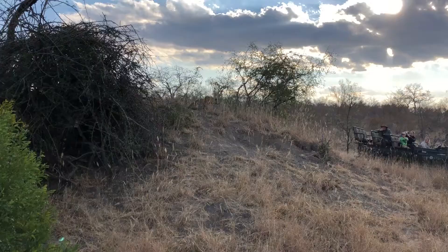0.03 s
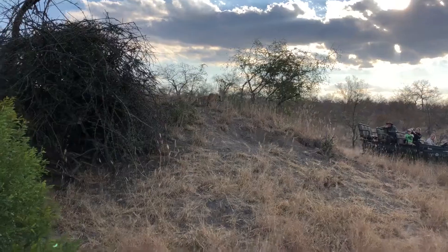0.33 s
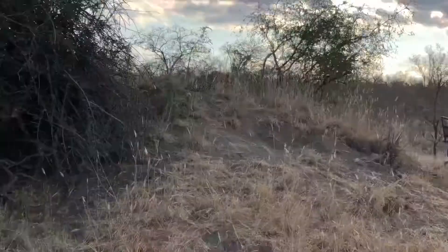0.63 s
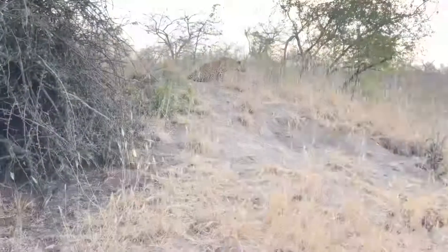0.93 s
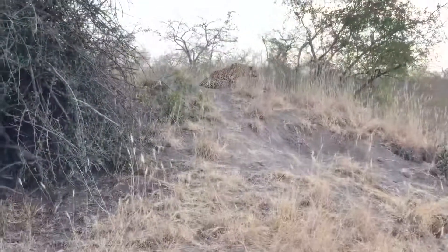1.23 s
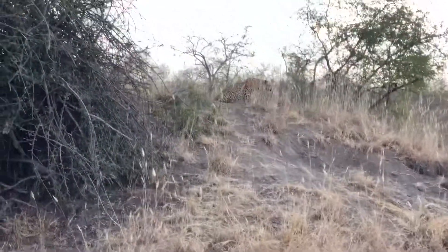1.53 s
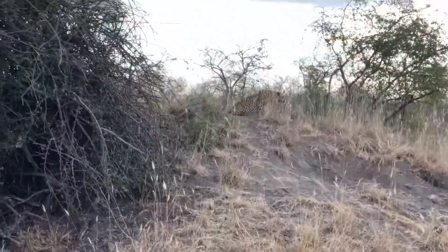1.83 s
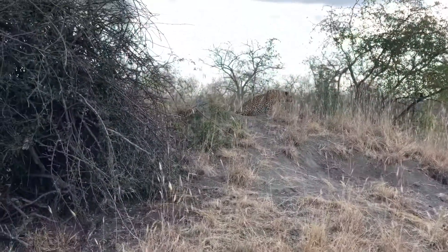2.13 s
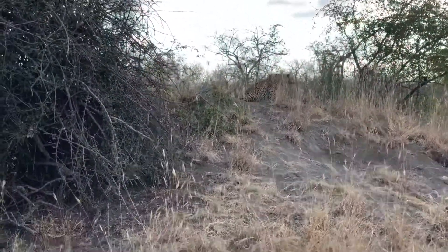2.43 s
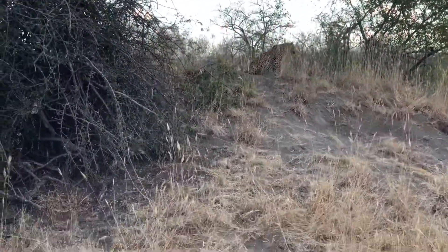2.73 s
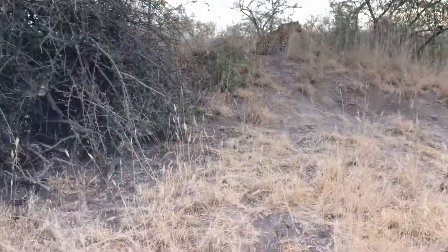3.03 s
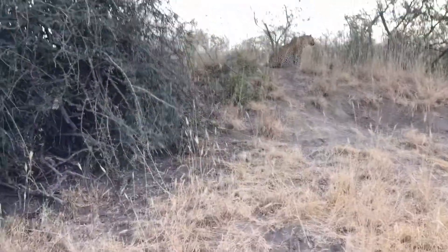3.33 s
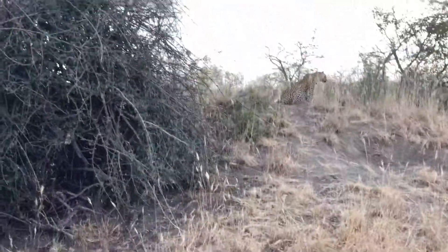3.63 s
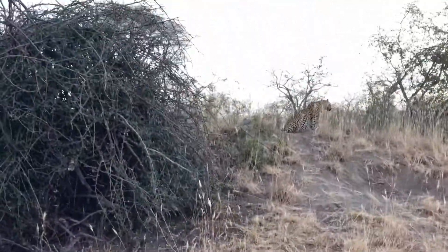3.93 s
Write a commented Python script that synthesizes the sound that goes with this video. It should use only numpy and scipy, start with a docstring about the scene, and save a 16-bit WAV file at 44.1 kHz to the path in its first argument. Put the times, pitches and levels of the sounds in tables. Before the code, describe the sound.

A leopard gives three hoarse, sawing rasps over an idling vehicle engine.

```python
"""Leopard sawing beside an idling vehicle

A leopard on a grassy mound saws three times: slow throat clicks on the in-stroke, then a hoarse low
rasp as its loose vocal folds flap on the out-stroke. Close by a vehicle idles with a throbbing
exhaust, ticking valves and a faintly chirping belt. Fingers tick on a camera; something rustles."""
import sys
import numpy as np
from scipy import signal
from scipy.fft import rfft, irfft
from scipy.io import wavfile
from scipy.ndimage import uniform_filter1d

SR = 44100
rng = np.random.default_rng(int(sys.argv[2]) if len(sys.argv) > 2 else 0)


def transcribe(u):
    """Save the signal u as a 16-bit wav file named by the first command-line argument.

    u: samples, shape (n,) or (channels, n), limited to [-1, 1]; the rate is SR.
    q: integer samples, one column per channel.
    """
    v = np.clip(np.atleast_2d(u).T, -1, 1)
    q = np.round(v * 32767).astype(np.int16)
    wavfile.write(sys.argv[1], SR, q)


N = 176400
T = np.arange(N) / SR

# colour of the open air: freq_hz, relative_db
AIR_COLOUR = [(400, -2.5), (480, -3.5), (1150, -6.5), (1750, -6), (2000, -13.5), (2700, -12.5), (3700, -21),
              (5200, -17.5), (6600, -27), (10000, -28.5), (15000, -36)]
# its fader: time_s, level_db
AIR_LEVEL = [(.6, -55), (1.4, -53), (2.7, -55.5), (4, -57)]
# engine speed as twice the firing rate: time_s, pitch_hz
ENGINE_SPEED = [(.6, 63), (1.15, 69), (1.7, 69), (2.1, 70), (2.8, 67.6), (4, 67.8)]
# the exhaust's second harmonic: time_s, level_db
BOOM_LEVEL = [(.25, -35), (.7, -45), (.83, -38.5), (1.0, -29), (1.2, -36), (2.15, -39.5), (3.05, -30.5),
              (4, -34.5)]
# its third harmonic: time_s, level_db
DRONE_LEVEL = [(.25, -31.5), (.68, -36), (.82, -44.5), (1.02, -37.5), (1.5, -40), (2.25, -35.5),
               (2.7, -48.5), (4, -41.5)]
# its other partials: multiple_of_firing_rate, level_db
EXHAUST_PARTIALS = [(1, -61), (2.5, -50), (3.5, -50.5), (4, -55.5), (5.5, -54.5), (7.6, -59.5), (11, -63)]
# colour of the engine rumble: freq_hz, relative_db
RUMBLE_COLOUR = [(20, -53), (45, -7.5), (90, 7.5), (140, -8), (180, -3.5), (275, -3), (330, -11),
                 (900, -44.5)]
# its fader: time_s, level_db
RUMBLE_LEVEL = [(.2, -42), (.65, -45.5), (1.6, -45), (2.7, -47), (4, -45.5)]
# hollow swells in the rumble: peak_s, half_width_s, pitch_hz, level_db
SWELLS = [(1.906, 0.2, 176.2, -44.5), (2.357, 0.061, 135, -39)]
# colour of the valve ticks: freq_hz, relative_db
TICK_COLOUR = [(900, 7), (2700, 6), (3300, -2.5), (4600, -20), (6500, -7), (16000, -20)]
# their fader: time_s, level_db
TICK_LEVEL = [(.9, -60.5), (1.3, -57.5), (2.75, -61.5), (3.0, -65)]
# resonances of the engine's bright chirr: freq_hz, width_hz, relative_db
CHIRR_BANDS = [(3820, 1200, 4.5), (4404, 240, 1), (4820, 500, 0)]
# its fader: time_s, level_db
CHIRR_LEVEL = [(1.0, -70), (1.25, -63.5), (2.1, -65.5), (2.8, -64), (2.97, -76)]
# resonances of the belt: freq_hz, width_hz, relative_db
BELT_BANDS = [(1497, 17, -4), (1591, 18, -2), (1692, 17.7, 2.5), (1803, 49, -2), (2146, 53, -12)]
# its fader: time_s, level_db
BELT_LEVEL = [(.25, -57), (.55, -60.5), (1.3, -57.5), (2.1, -64), (3.1, -56), (4, -59)]

# band of the dry rustle: freq_hz, width_hz, relative_db
RUSTLE_BAND = [(3450, 2200, 0)]
# its fader: time_s, level_db
RUSTLE_LEVEL = [(3.28, -90), (3.34, -64), (3.45, -68.5), (3.56, -90)]
# fader of the rubbing fingers: time_s, level_db
RUB_LEVEL = [(.7, -72.5), (.88, -66.5), (1.55, -68), (2.4, -74.5), (3.3, -80), (3.37, -66), (3.55, -75)]
# finger ticks: start_s, level_db, decay_s
FINGER_TICKS = [(1.117, -43, .008), (1.133, -49, .009), (1.400, -40, .006), (2.0805, -39.5, .006),
                (2.850, -53, .002)]
# colour of the rub and the finger ticks: freq_hz, relative_db
SHELL_COLOUR = [(2000, -11), (6000, -4.5), (8000, -2.5), (9700, 1), (12000, -1.5), (14500, 1)]

# echo off the bush: delay_s, gain_db
BUSH_ECHO = [(.037, -14.5)]
# throat slaps on the in-strokes: start_s, level_db
THROAT_SLAPS = [(0.173, -31.5), (0.273, -31), (0.748, -33), (.783, -32.5), (0.815, -29), (1.333, -32),
                (1.368, -31), (1.406, -36)]
# the throat modes they ring: freq_hz, gain_db, t60_s
THROAT_MODES = [(220, 0.5, 0.037), (434, 0.5, 0.009), (925, -9, 0.024)]
# hard catches of the voice: start_s, level_db
CATCHES = [(.380, -38.5), (.924, -39.5), (.960, -30.5), (1.531, -41), (1.592, -29.5)]
# resonances of the open mouth: freq_hz, width_hz, relative_db
MOUTH_BANDS = [(182, 29, -2.5), (274, 52, -4), (527, 52, -3.5), (630, 51, -1.5), (795, 40, 1.5),
               (935, 35, 1), (1021, 43, 2.5)]
# upper resonances that colour the hiss: freq_hz, width_hz, relative_db
MUZZLE_BANDS = [(1426, 104, 10), (1702, 26, 12), (2124, 380, 8.5), (2593, 45, 13.5), (2790, 500, 0.5),
                (4400, 750, -4.5), (8160, 2000, -11.5)]
# out-strokes: start_s, length_s, chest_db, mouth_db, hiss_db, hollow_hz, hollow_db, tail_db
RASPS = [(0.394, 0.06, -28, -41, -46.5, 835, -49.5, -39.5), (0.932, 0.093, -29, -44, -48.3, 780, -49, -45),
         (1.531, 0.0773, -31.5, -47, -54, 735, -46, -39)]


def from_db(db):
    """Decibels to gain."""
    return 10 ** (np.asarray(db) / 20)


def rms_one(x):
    """Scale to rms 1."""
    return x / np.sqrt(np.mean(x ** 2) + 1e-20)


def curve(rows):
    """Join (time_s, value) rows by straight lines."""
    return np.interp(T, *np.transpose(rows))


def drift(rate_hz):
    """Random wander up to about rate_hz, rms 1."""
    rolloff = 1 + (np.fft.rfftfreq(N, 1 / SR) / rate_hz) ** 4
    return rms_one(irfft(rfft(rng.standard_normal(N)) / rolloff, N))


def noise(colour):
    """Noise of a given colour, rms 1."""
    hz, db = np.transpose(colour)
    gain = from_db(np.interp(np.log(np.fft.rfftfreq(N, 1 / SR) + 1), np.log(hz), db))
    return rms_one(irfft(rfft(rng.standard_normal(N)) * gain, N))


def band_noise(bands):
    """White noise through steep resonances in parallel."""
    white = rng.standard_normal(N)
    out = 0
    for hz, width, db in bands:
        r = np.exp(-np.pi * width * np.sqrt(2) / SR)
        b = (1 - r * r) / 2 * np.array([1, 0, -1])
        a = [1, -2 * r * np.cos(2 * np.pi * hz / SR), r * r]
        out += from_db(db) * signal.lfilter(b, a, signal.lfilter(b, a, white))
    return out


def tone(pitch_hz):
    """A sine that follows a moving pitch, rms 1."""
    return np.sqrt(2) * np.sin(2 * np.pi * np.cumsum(pitch_hz) / SR)


def ring(clicks, hz, t60):
    """Each click sets off a dying sine."""
    r, w = from_db(-60 / (t60 * SR)), 2 * np.pi * hz / SR
    return signal.lfilter([0, np.sin(w)], [1, -2 * r * np.cos(w), r * r], clicks + 1e-18)


def puffs(turns, sharpness):
    """One smooth puff each turn, rms 1."""
    return rms_one(np.exp(sharpness * np.cos(2 * np.pi * turns)))


def leveller(x, samples):
    """Ride the gain to hold the running rms near 1."""
    return x / np.sqrt(np.abs(uniform_filter1d(x * x, samples)) + 1e-12)


def open_air():
    """A soft bed of air and far machine hiss."""
    return from_db(curve(AIR_LEVEL)) * noise(AIR_COLOUR)


def exhaust(firings):
    """Wavering partials of the firing rate throb over a low rumble."""
    def partial(multiple, db, waver_db):
        gain = np.sqrt(2) * from_db(db + waver_db * drift(22.2))
        turns = multiple * firings + rng.random() + 0.0042 * multiple * drift(10.6)
        return gain * np.sin(2 * np.pi * turns)
    boom = partial(2, curve(BOOM_LEVEL), waver_db=0.57)
    drone = partial(3, curve(DRONE_LEVEL), waver_db=3)
    others = sum(partial(multiple, db, waver_db=4) for multiple, db in EXHAUST_PARTIALS)
    return boom + drone + others + from_db(curve(RUMBLE_LEVEL)) * noise(RUMBLE_COLOUR)


def swells():
    """Soft low tones rise out of the rumble and sink back."""
    waver = 1 + 0.017 * drift(12)
    return sum(from_db(db) * np.exp(-((T - peak) / half_width) ** 2) * tone(hz * waver)
               for peak, half_width, hz, db in SWELLS)


def valves(firings):
    """A bright tick and a chirr with every firing, each of a slightly different strength."""
    turns = firings + 0.33   # a third of a firing ahead
    ticks = from_db(curve(TICK_LEVEL)) * puffs(turns, sharpness=0.36) * noise(TICK_COLOUR)
    chirr = from_db(curve(CHIRR_LEVEL)) * puffs(turns, sharpness=.7) * rms_one(band_noise(CHIRR_BANDS))
    return from_db(1.5 * np.tanh(drift(41))) * (ticks + chirr)


def belt(firings):
    """The belt chirps hoarsely for half of each turn, dipping mid-chirp; its tone slowly dulls."""
    firings_per_turn, joint_turns = 6.04, .2
    dulling_db_per_octave_s, pivot_hz, wander_db = 6, BELT_BANDS[2][0], 3
    squeal = 0
    for hz, width, db in BELT_BANDS:
        dulling_db = dulling_db_per_octave_s * np.log2(hz / pivot_hz) * (T - T.mean())
        band = leveller(band_noise([(hz, width, 0)]), samples=1400)
        squeal += from_db(db - dulling_db + wander_db * drift(11)) * band
    roughness = from_db(1.5 * np.tanh(drift(90)))
    squeal = rms_one(leveller(squeal, samples=1400) * roughness)
    from_joint = (firings / firings_per_turn - joint_turns + .5) % 1 - .5
    grip_db = 6.5 * np.tanh(2.5 * np.cos(2 * np.pi * from_joint))
    dip_db = 6 * np.exp(-((from_joint + 0.039 * drift(1.2)) / .07) ** 2)
    return from_db(curve(BELT_LEVEL)) * rms_one(from_db(grip_db - dip_db)) * squeal


def rustle():
    """A short grainy rustle, as of cloth or dry grass."""
    return from_db(curve(RUSTLE_LEVEL) + 2 * drift(120)) * rms_one(band_noise(RUSTLE_BAND))


def fingers():
    """Fingers rub and tick on a camera's shell."""
    envelope = from_db(curve(RUB_LEVEL) + 4.4 * drift(120))
    for start, db, decay in FINGER_TICKS:
        age = np.maximum(T - start, 0)
        attack = 1 - np.exp(-age / 0.00088)
        envelope += from_db(db) * attack * np.exp(-np.minimum(age / decay, 40))
    return envelope * noise(SHELL_COLOUR)


def bush(voice):
    """The voice plus one dull echo off the bush."""
    dull = signal.sosfilt(signal.butter(1, 700, fs=SR, output="sos"), voice)
    return voice + sum(from_db(db) * np.interp(T - delay, T, dull, left=0) for delay, db in BUSH_ECHO)


def throat_clicks():
    """On the in-stroke the folds slap slowly enough to be heard one by one."""
    starts, slap_db = np.transpose(THROAT_SLAPS)
    out = 0
    for hz, mode_db, t60 in THROAT_MODES:
        slaps = np.zeros(N)
        slaps[(starts * SR).astype(int)] = from_db(slap_db + mode_db + rng.normal(0, 1, len(starts)))
        out += ring(slaps, hz, t60)
    return signal.sosfilt(signal.butter(2, 1600, fs=SR, output="sos"), out)


def catches():
    """Short hard barks of air in the mouth's main resonance."""
    pitch_hz, rise_s = 892, 0.0015
    bark = tone(pitch_hz * (1 + 0.0598 * drift(216)))
    return bark * sum(from_db(db) * np.exp(-((T - start - rise_s) / rise_s) ** 2)
                      for start, db in CATCHES)


def rasps():
    """Loose folds flap unevenly: a rough chest tone and puffs of breath, then a low falling tail."""
    flap_hz, flap_jitter = 61, 0.23
    attack_s, release_s, arch_db = .019, .015, 4
    chest_hz, sag_hz_per_s, pitch_arch = 220, 10, .08
    tail_hz, fall_hz_per_s, tail_delay_s, tail_half_width_s = 165.5, 350, 0.028, 0.044
    flaps = np.cumsum(flap_hz * (1 + flap_jitter * drift(87))) / SR
    mouth = puffs(flaps, sharpness=0.32) * leveller(band_noise(MOUTH_BANDS), samples=500)
    hiss = puffs(flaps, sharpness=0.57) * leveller(band_noise(MUZZLE_BANDS), samples=400)
    wobble = 1 + .09 * drift(73)
    shimmer = from_db(2.85 * np.tanh(drift(73)))
    out = 0
    for start, length, chest_db, mouth_db, hiss_db, hollow_hz, hollow_db, tail_db in RASPS:
        fade = np.maximum(start - T, 0) / attack_s + np.maximum(T - start - length, 0) / release_s
        # level and pitch both crest mid-stroke
        arch = np.sin(np.pi * np.clip((T - start) / length, 0, 1)) - 1
        effort = np.exp(-fade) * from_db(arch_db * arch)
        pitch = (chest_hz - sag_hz_per_s * start) * wobble * (1 + pitch_arch * (arch + .5))
        chest = from_db(chest_db) * shimmer * tone(pitch)
        hollow = from_db(hollow_db) * leveller(band_noise([(hollow_hz, 45, 0)]), samples=700)
        out += effort * (chest + from_db(mouth_db) * mouth + from_db(hiss_db) * hiss + hollow)
        from_tail_peak = T - start - length - tail_delay_s
        groan = tone((tail_hz - fall_hz_per_s * from_tail_peak) * wobble)
        out += from_db(tail_db) * np.exp(-(from_tail_peak / tail_half_width_s) ** 2) * groan
    return out


def scene():
    """Mono mix: the leopard over the idling vehicle, the air and the small noises."""
    firings = np.cumsum(curve(ENGINE_SPEED) / 2) / SR
    leopard = bush(rasps() + catches() + throat_clicks())
    vehicle = exhaust(firings) + swells() + valves(firings) + belt(firings)
    return (leopard + vehicle + open_air() + fingers() + rustle())[None]


def record(dry):
    """Open after a moment of silence and cut the very top."""
    silence_s, cutoff_hz = .156, 15800
    fade_in = np.clip((T - silence_s) * 1000, 0, 1)
    high_cut = signal.ellip(10, .1, 80, cutoff_hz, fs=SR, output="sos")
    return signal.sosfilt(high_cut, dry * fade_in + 1e-18)


dry = scene()
out = record(dry)
transcribe(out)
```